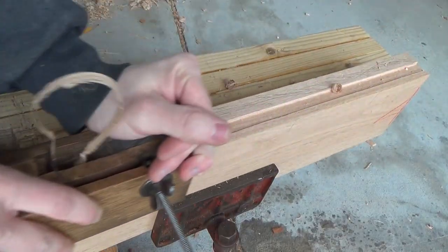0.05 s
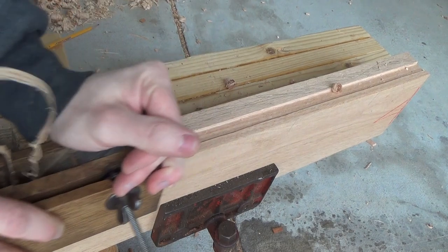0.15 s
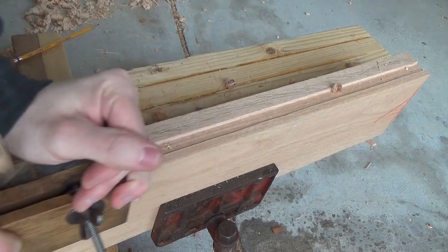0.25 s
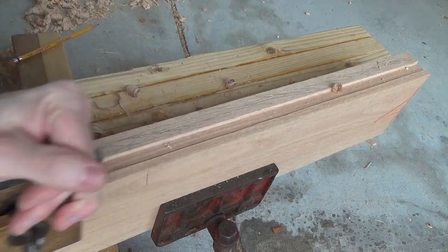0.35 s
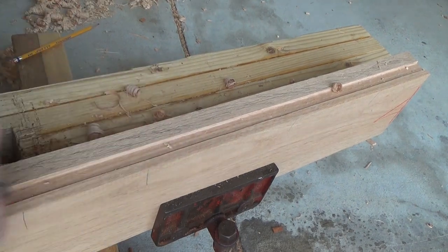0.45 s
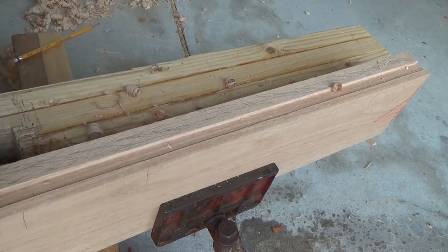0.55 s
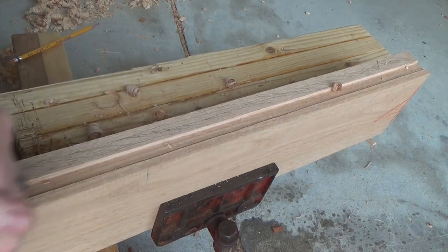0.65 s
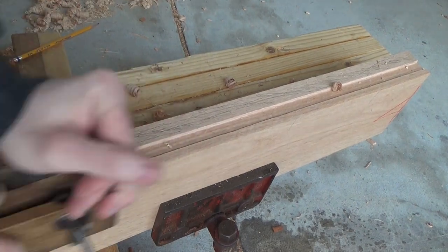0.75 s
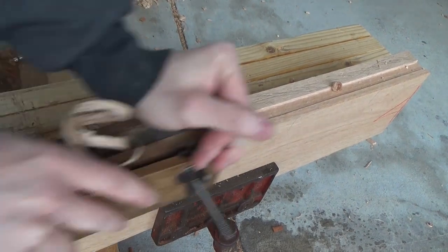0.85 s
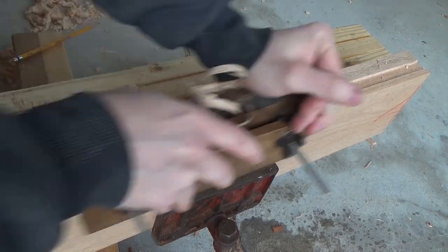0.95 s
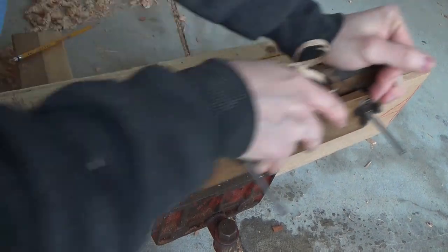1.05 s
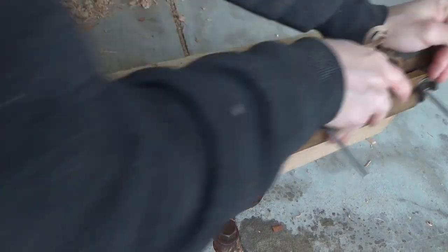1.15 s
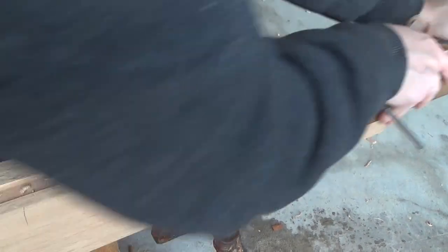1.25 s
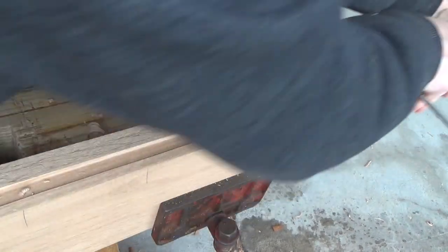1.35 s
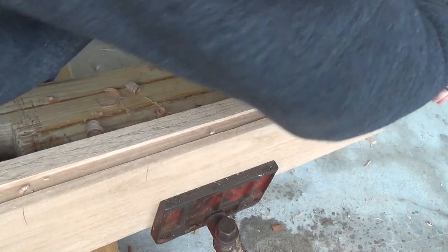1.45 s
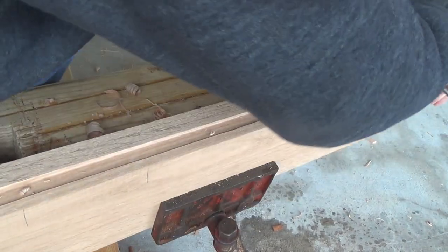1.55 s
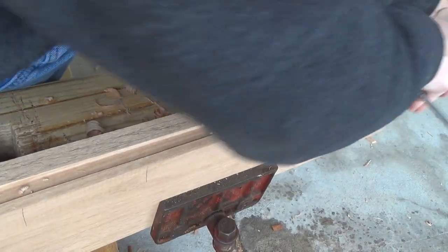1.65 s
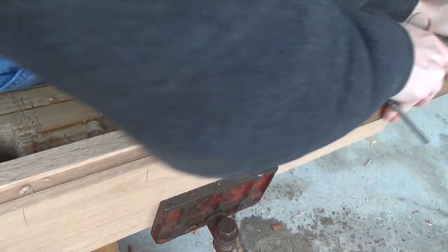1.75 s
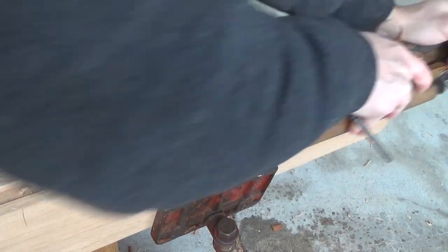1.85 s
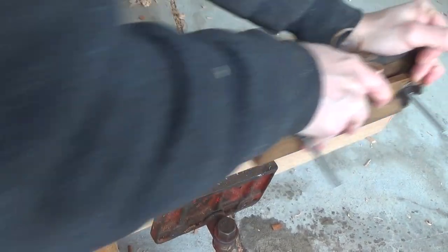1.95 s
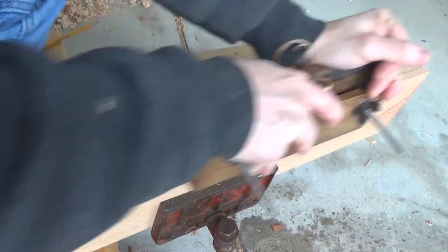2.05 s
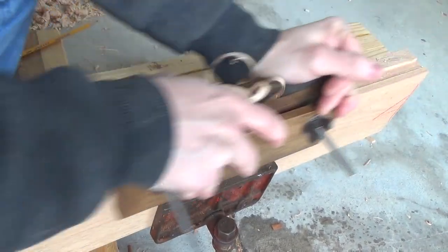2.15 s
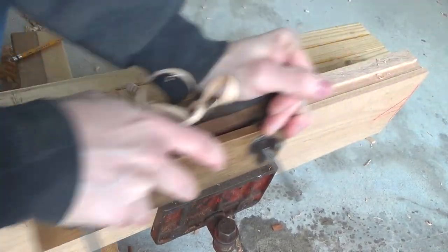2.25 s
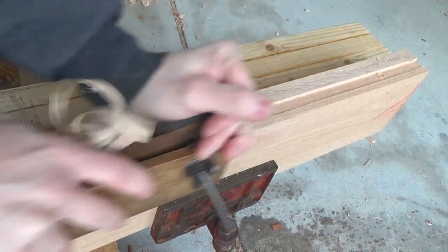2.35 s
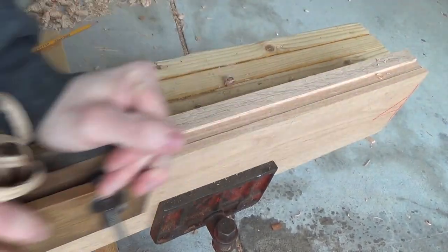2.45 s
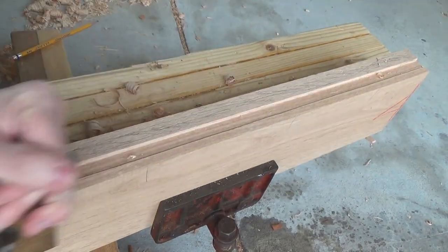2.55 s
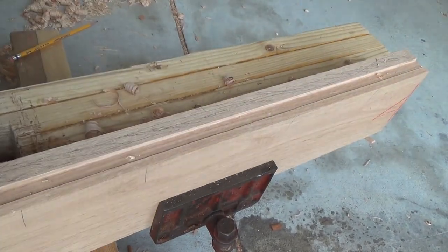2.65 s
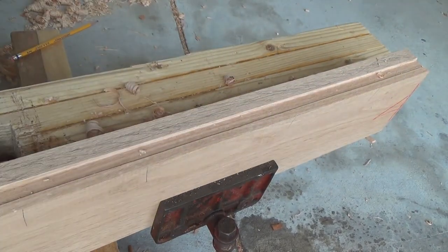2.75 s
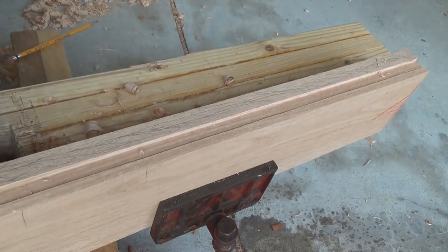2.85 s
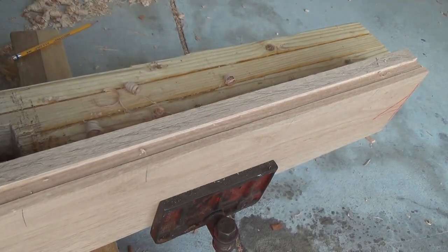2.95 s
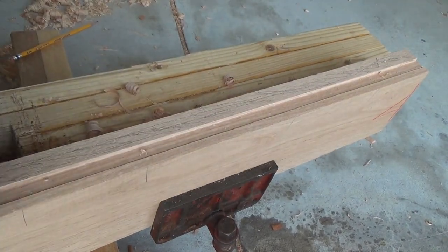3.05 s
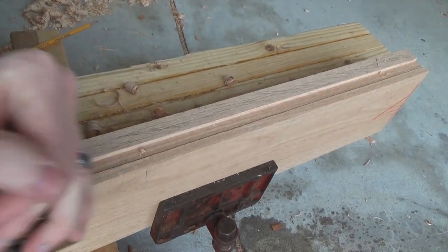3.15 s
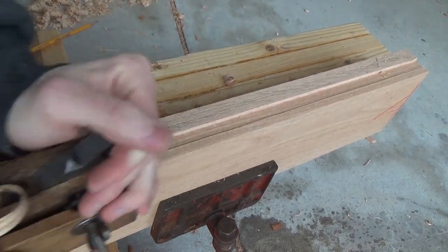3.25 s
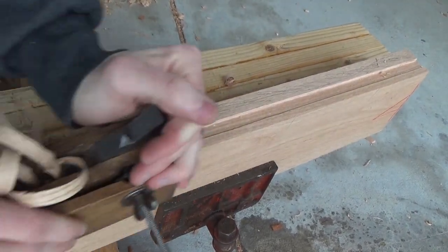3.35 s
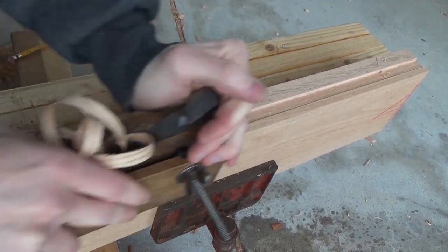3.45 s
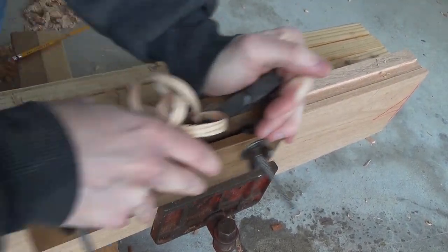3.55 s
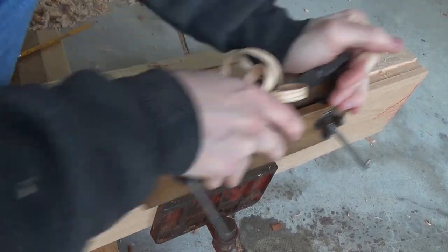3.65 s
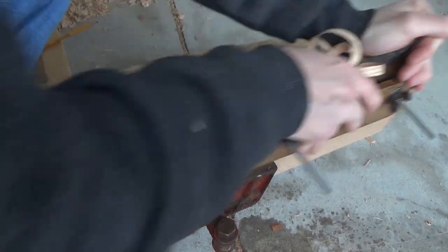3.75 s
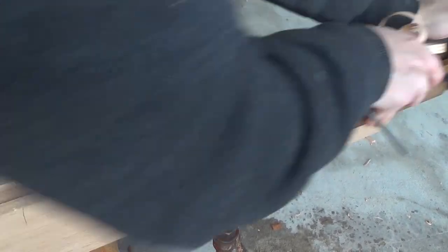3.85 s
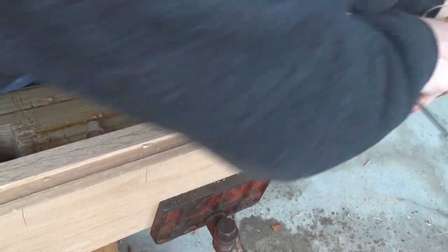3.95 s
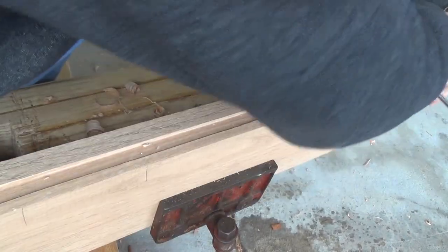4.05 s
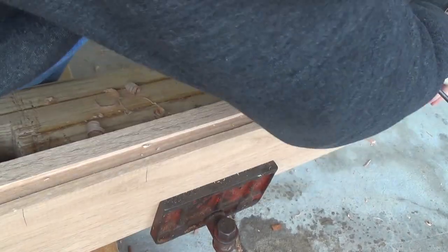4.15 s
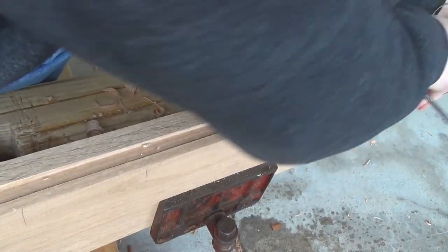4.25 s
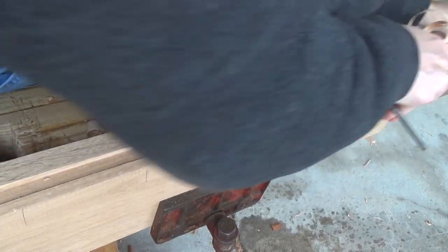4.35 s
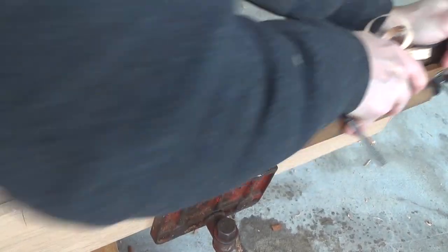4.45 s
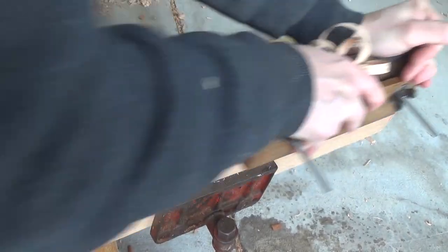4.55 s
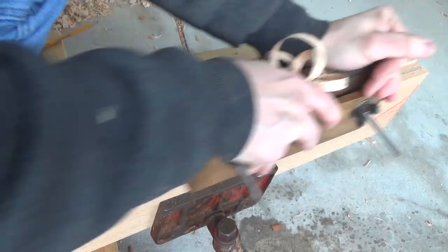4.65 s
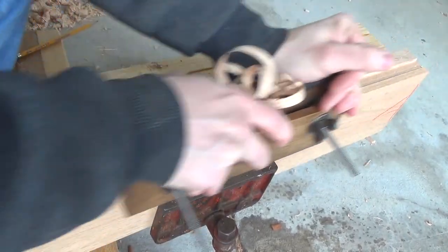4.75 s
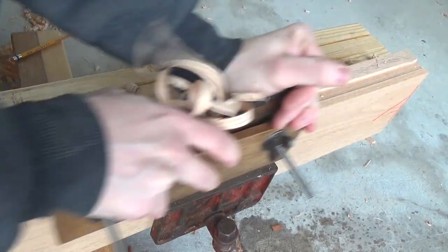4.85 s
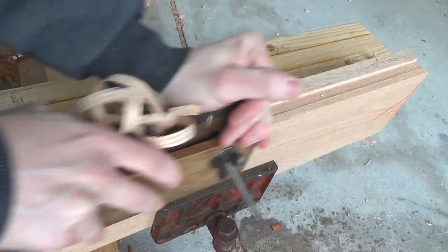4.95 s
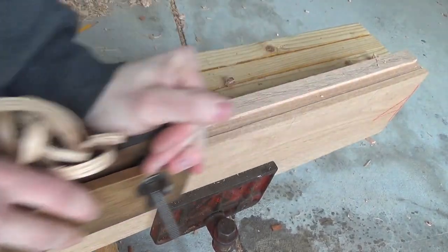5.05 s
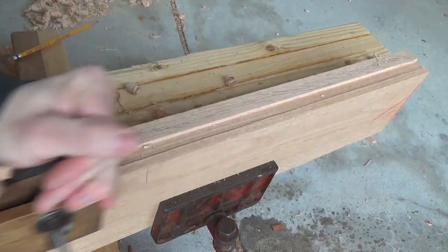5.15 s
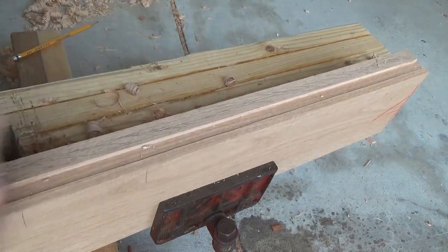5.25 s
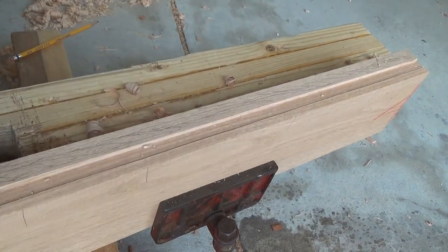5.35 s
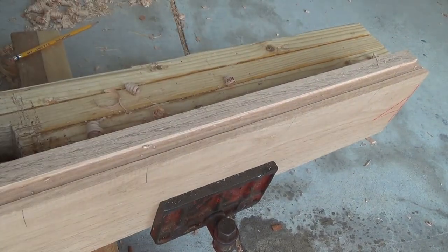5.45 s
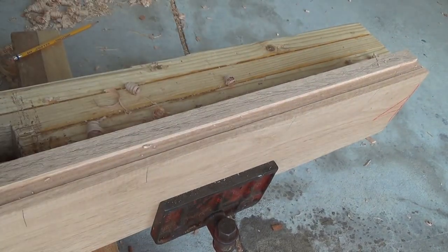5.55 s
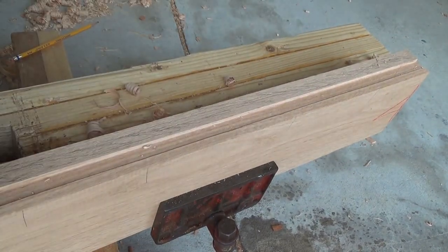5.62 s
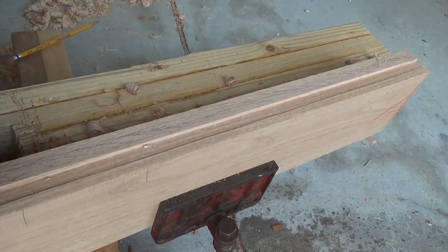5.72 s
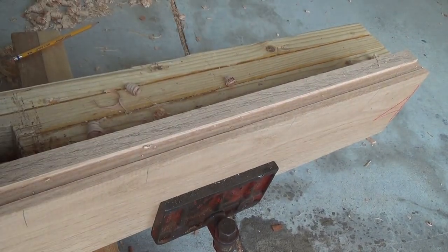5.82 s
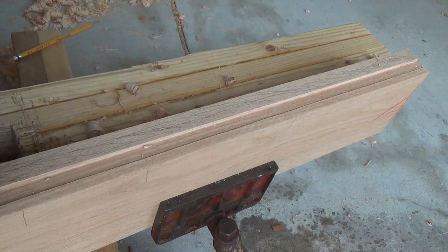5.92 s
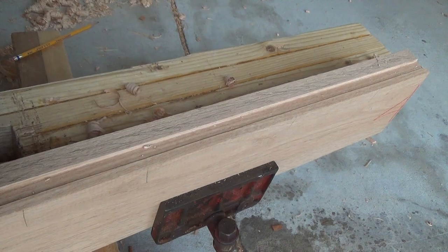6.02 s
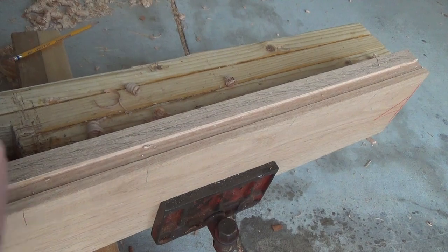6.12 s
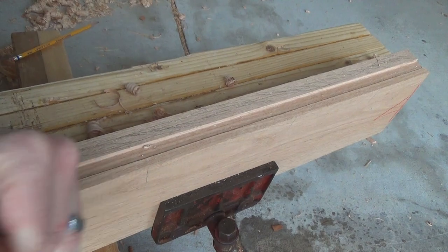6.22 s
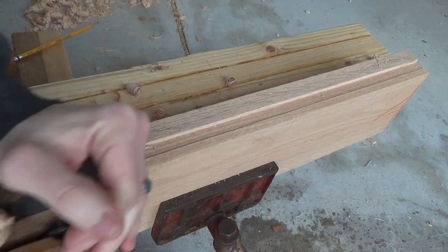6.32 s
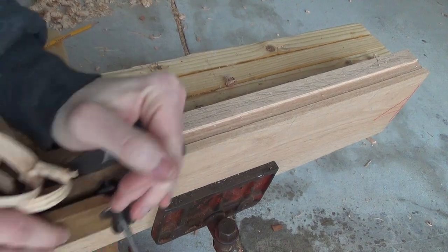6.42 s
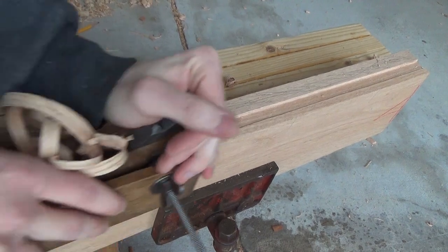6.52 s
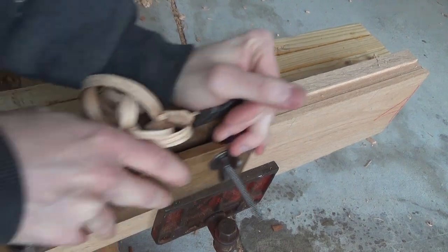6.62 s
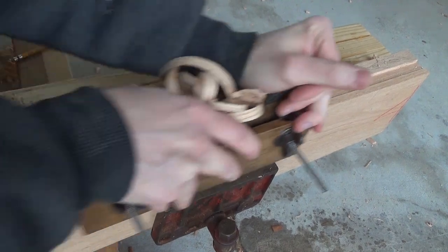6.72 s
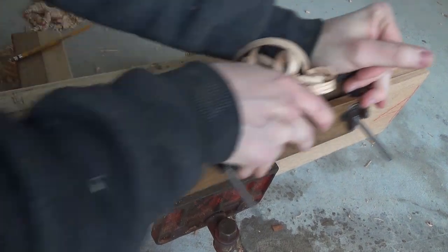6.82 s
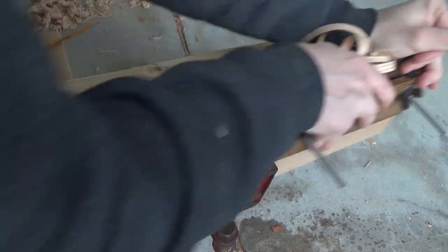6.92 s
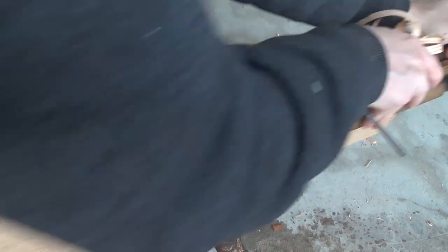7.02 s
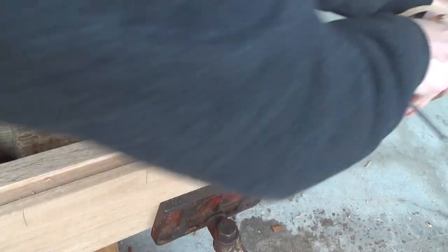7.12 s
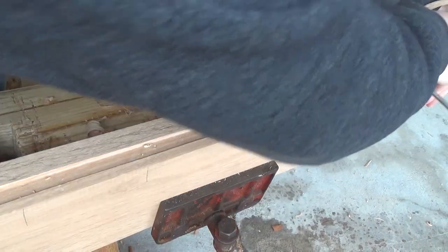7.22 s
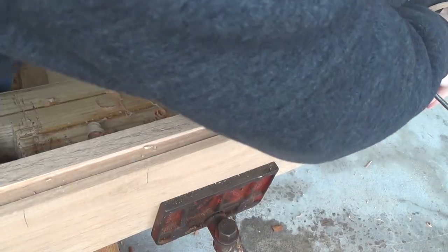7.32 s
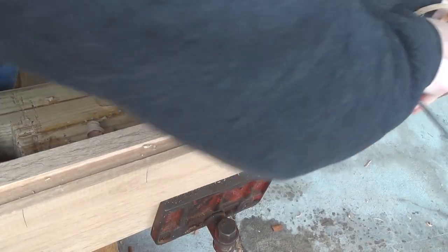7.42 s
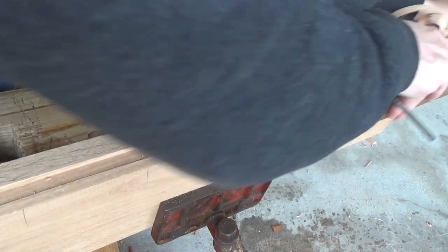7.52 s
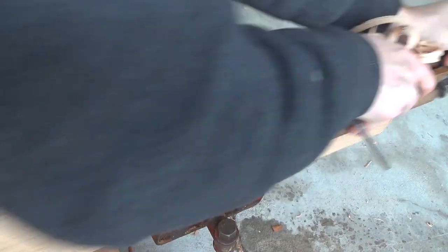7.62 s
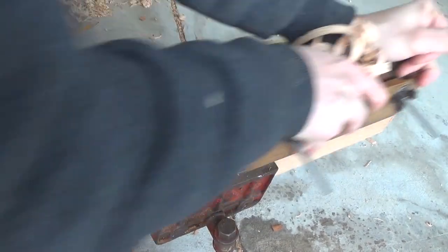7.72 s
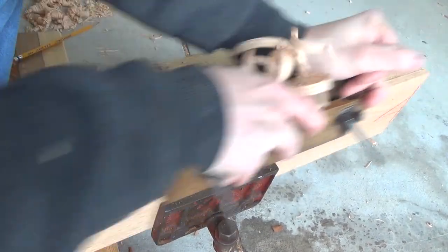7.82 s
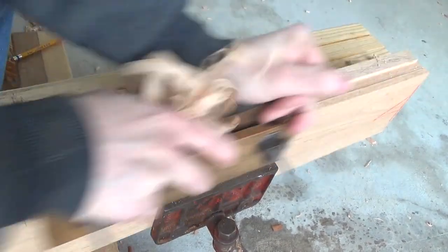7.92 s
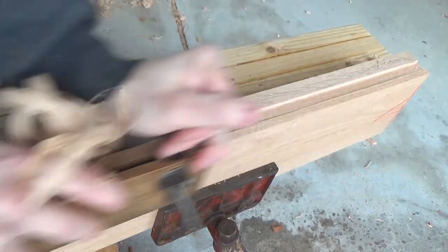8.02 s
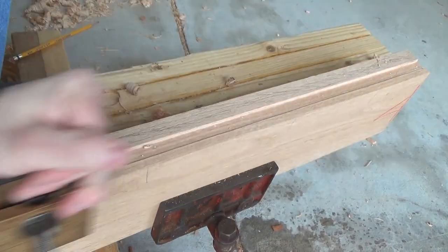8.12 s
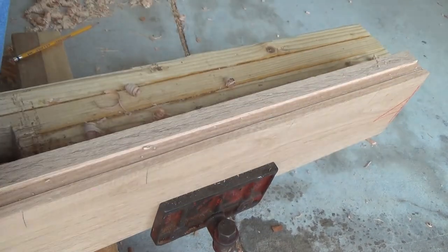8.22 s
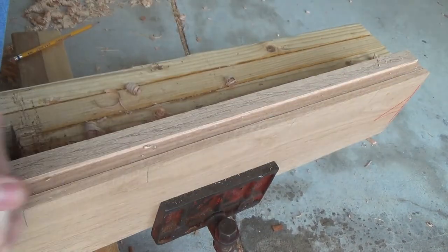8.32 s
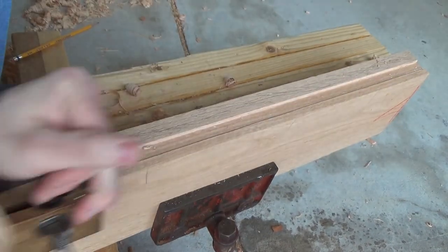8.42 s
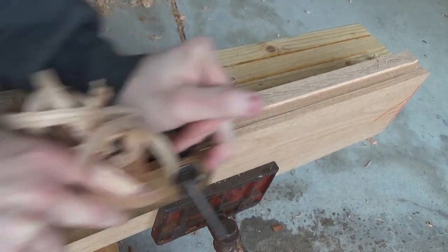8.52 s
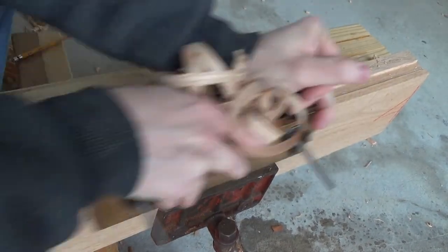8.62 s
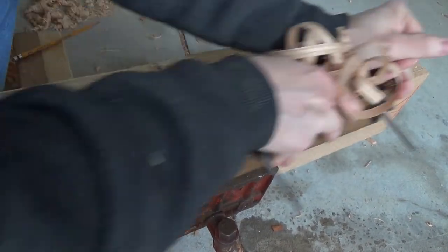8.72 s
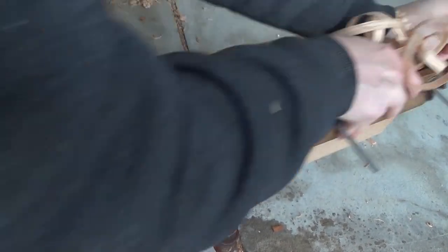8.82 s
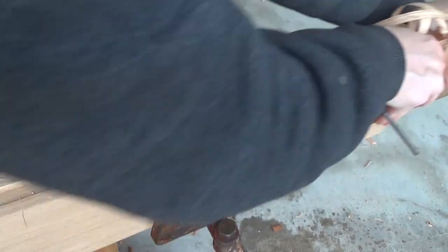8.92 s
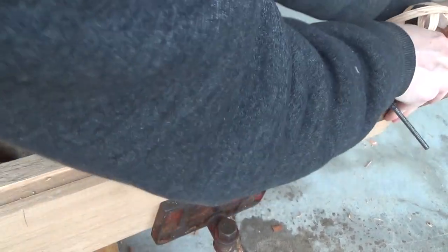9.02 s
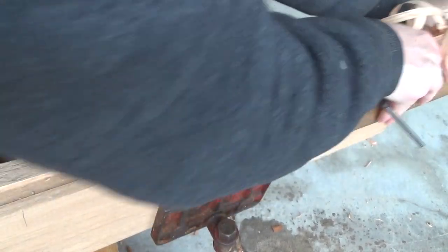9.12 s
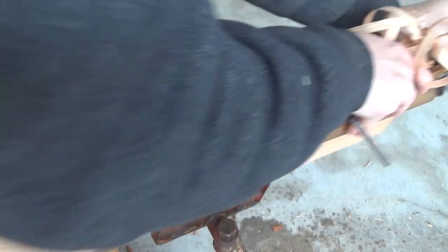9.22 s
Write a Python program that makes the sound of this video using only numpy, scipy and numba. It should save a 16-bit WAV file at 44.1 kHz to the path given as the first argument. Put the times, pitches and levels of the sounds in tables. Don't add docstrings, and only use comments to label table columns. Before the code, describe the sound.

A close, dry workshop scene with low airy hum and bench rumble. A raspy drag of a wooden plane on hardwood is under way until 0.5 s, then a brief lift with faint ticks. A lighter push runs 0.7-1.4 s, ending in a hard double knock. A long, strong drag tears from 1.75 to 2.65 s, with bright shaving crackles near 2.4. A clack at 2.8 and soft bumps around 3 s lead to landing knocks at 3.46 and an even push to 4.05. Another drag fills 4.4-5.3 s, then a sharp clatter at 5.5 and near quiet. A landing at 6.5 starts an uneven, squawking push to 7.25. The hardest drag, loud and coarse, peaks near 7.8 and ends at 8.2. A firm knock at 8.47 begins a push until 9; a final drag starts at 9.17 and is cut off.

```python
import sys
import numpy as np
from scipy import signal
from scipy.fft import rfft, irfft, next_fast_len
from scipy.io import wavfile
from scipy.ndimage import uniform_filter1d
from numba import njit

SR = 44100
rng = np.random.default_rng(int(sys.argv[2]) if len(sys.argv) > 2 else 0)


def gain_from_db(level_db):
    decades = np.asarray(level_db, float) / 20
    return 10 ** decades


def master(y):
    cut = np.clip(np.atleast_2d(y).T, -1, 1)
    pcm = np.round(cut * 32767)
    wavfile.write(sys.argv[1], SR, pcm.astype(np.int16))


N = 409236


def level(x, db):
    return x * gain_from_db(db) / np.sqrt(np.mean(x ** 2))


def colour(x, points):
    hz, db = np.transpose(points)
    n = next_fast_len(x.shape[-1])
    bins_hz = np.arange(n // 2 + 1) * SR / n
    gain = gain_from_db(np.interp(np.log(bins_hz + 1), np.log(hz), db))
    return irfft(rfft(x, n) * gain, n)[..., :x.shape[-1]]


def damped(x, top_hz):
    return signal.sosfilt(signal.butter(2, top_hz, fs=SR, output="sos"), x)


@njit
def svf(x, hz, width):
    y, b, l = np.empty(len(x)), 0., 0.
    for i in range(len(x)):
        g, k = np.tan(np.pi * hz[i] / SR), width / hz[i]
        v = (b + g * (x[i] - l)) / (1 + g * (g + k))
        b, l, y[i] = 2 * v - b, l + 2 * g * v, k * v
    return y


def burst_band(burst, hz, width_hz):
    return svf(burst, np.full(len(burst), 1. * hz), 1. * width_hz)


def walk(rate_hz):
    k = int(SR / rate_hz)
    held = np.repeat(rng.standard_normal(N // k + 1), k)
    return 1.49 * uniform_filter1d(uniform_filter1d(held, k), k)[:N]


def swell(t, s, db, rise_s, fall_s):
    range_db = 20
    return db - range_db * np.where(t < s, (s - t) / max(rise_s, .001), (t - s) / max(fall_s, .001))


def blend(movements):
    power = sum(gain_from_db(2 * db) for db, _ in movements)
    return 10 * np.log10(power), sum(gain_from_db(2 * db) * quality for db, quality in movements) / power


def add(out, s, sound):
    i = int(s * SR)
    out[i:i + len(sound)] += sound[:N - i]


def ring(hz, t60_s, t):
    return np.sin(2 * np.pi * hz * t) * np.exp(-np.log(1000) * t / t60_s)


def wide_noise(points):
    mid, side = colour(rng.standard_normal((2, N)), points)
    return mid + .5 * side * np.array([[1], [-1]])


# freq_hz, density_db_per_hz
AIR = [(18, -35), (30, -41), (109, -48), (239, 6), (486, -8.5), (721, 0.5), (1350, -6), (1540, -6.5),
       (1720, -7), (4300, -27), (9970, -26.5), (14000, -23), (16000, -15)]
# pitch_hz, rms_db
WHINE = [(15734, -63)]
# peak_s, peak_db, rise_s, fall_s
RUMBLE_SWELLS = [(0.1, -38.5, .5, 5), (0.7, -51, .5, .6), (1.5, -35, 0.25, 2.3), (2.4, -30.5, 1.2, 2.9),
                 (3.1, -32.5, 2, 0.71), (3.7, -41, .6, 0.5), (5.65, -34.5, .6, 0.52), (6.1, -36.5, 0.55, 1.5),
                 (6.6, -34, 0.65, 0.28), (7.6, -33.5, 0.65, 0.62), (8.55, -37, 0.33, .6), (9.25, -31.5, 0.42, 1.5)]


def hum(t):
    air = level(wide_noise(AIR), -37) * gain_from_db(1.0 * walk(3.59))
    still_db = -51
    rumble_db, _ = blend([(swell(t, *row), 0) for row in RUMBLE_SWELLS] + [(still_db, 0)])
    bass = wide_noise([(15, -30), (30, 4), (50, -4), (65, -1.5), (105, 0.5), (160, -3), (300, -45)])
    rumble = level(bass, 0) * gain_from_db(rumble_db + 2.6 * walk(10))
    whine = sum(np.sqrt(2) * gain_from_db(db) * np.sin(2 * np.pi * hz * t) for hz, db in WHINE)
    return air + rumble + whine


def fibres(per_s, spread_db):
    breaks = rng.random(N) < per_s / SR
    return level(breaks * rng.standard_normal(N) * gain_from_db(spread_db * rng.exponential(size=N)), 0)


def resonate(force, modes, weight, drift, shift=1):
    out, power = 0, 0
    for k, (hz, width_hz, db) in enumerate(modes):
        gain = gain_from_db(db) * weight(hz)
        width_hz = min(width_hz, 25 + .04 * hz)
        mode = svf(force, hz * shift * (1 + drift * walk(5)), 1. * width_hz)
        mode = mode * np.sqrt(SR / np.pi / width_hz)
        out = out + (-1) ** k * gain * gain_from_db(2.0 * walk(12)) * mode
        power = power + gain ** 2
    return out / np.sqrt(power)


# freq_hz, width_hz, level_db
BODY = [(645, 92, -5.5), (786, 22.4, -3), (857, 52, -3), (1003.5, 86, -1.5), (1110, 130, -1),
        (1285.5, 210, 0.5), (1381, 87, -0.5), (1583, 270, -3.5), (1992, 140, -8)]


def body(cut, body_db, grip):
    upper = np.clip(grip, .05, .95)
    deep = gain_from_db(0.3 * (np.clip(body_db, -28, -12) + 7.0))

    def weight(hz):
        if hz > 1200:
            return upper ** 2
        return (1 - upper) ** 2 * (deep if hz < 950 else 1)

    return gain_from_db(body_db) * resonate(damped(cut, 2900), BODY, weight, drift=0.015)


# freq_hz, width_hz, level_db
BLADE = [(2143, 750, -3), (2486, 400, -1), (2786, 540, 1), (3043, 360, 0.5), (3855, 480, -8),
         (5306, 660, 1), (6184, 270, -3.5)]


def blade(cut, body_db, blade_db, shaving_db, shift):
    bright = gain_from_db(.7 * (shaving_db - blade_db + 3) + .4 * np.clip(body_db + 24, -15, 0))
    sound = resonate(damped(cut, 7500), BLADE, lambda hz: bright if hz > 4500 else 1,
                     drift=.012, shift=np.sqrt(shift))
    return gain_from_db(blade_db + .5 * np.clip(body_db + 29.5, -12, 0)) * sound


# freq_hz, density_db_per_hz
SHAVING = [(2940, -5), (5000, -3), (5380, -11.5), (6700, -6), (8380, -6), (11500, -5), (15100, -13),
           (16000, -73)]


def shaving(chatter, body_db, shaving_db, shift):
    curl = colour(fibres(12000, spread_db=1.5) * gain_from_db(0.78 * chatter), SHAVING)
    curl = curl + .65 * svf(curl, 8400 * shift * (1 + .02 * walk(4)), 500.)
    high = svf(curl, 11200 * shift * (1 + .04 * walk(4)), 400.)
    curl = level(curl + .6 * high, 0)
    grain = sum((gain_from_db(2.2 * walk(18)) - 1) * burst_band(curl, hz, hz / 4)
                for hz in (4200., 6000., 8000., 10500.))
    curl = curl + grain
    dull = damped(curl, 12600)
    top_db = 0.29 * (np.clip(shaving_db, -50, -15) + 25) + 0.66 * (shaving_db - body_db + 6) + 1.2 * walk(25)
    return gain_from_db(shaving_db) * (dull + (curl - dull) * gain_from_db(top_db))


# freq_hz, width_hz, level_db
BENCH = [(160, 64, 1.5), (236.4, 20.4, 0), (318, 40, -3), (438.3, 60, -0.5), (548, 98, -3.5),
         (195, 56, -0.5), (274, 50, -3.5), (385, 60, -7), (651, 60, -6.5), (810, 100, -6)]
# peak_s, peak_db, rise_s, fall_s, favoured_hz
SHUDDERS = [(0.21, -22, 0.46, 0.41, 179), (.3, -28, 0.69, .35, 560), (0.75, -28, 0.16, 0.29, 205),
            (1.03, -26.5, 0.11, 0.32, 295), (1.3, -27, 0.2, .3, 440), (1.425, -16, 0.034, 0.17, 328),
            (1.87, -18.5, 0.18, 0.48, 263), (2.3, -24.5, 0.56, 0.56, 520), (2.83, -28.5, 0.26, 0.4, 200),
            (3.49, -19, 0.036, 0.41, 298), (4.05, -28, 0.21, 0.15, 325), (4.4, -32.5, 0.043, 0.33, 340),
            (4.82, -22, 0.36, 0.56, 260), (5.512, -14, .006, .09, 720), (5.525, -14.5, 0.012, 0.13, 400),
            (5.6, -24, 0.056, 0.24, 237), (5.87, -31, .2, 0.42, 252), (6.2, -38, 0.98, 1.5, 420),
            (6.5, -17.5, .02, 0.44, 300), (7.25, -22.5, 0.094, 0.26, 300), (7.53, -19, .02, 0.44, 248),
            (8.474, -15, 0.013, 0.25, 195), (9.2, -24, 0.026, 1.5, 320)]


def bench(t):
    rest_db, rest_hz = -42.5, 280
    moves = [(swell(t, *row[:4]), row[4]) for row in SHUDDERS]
    bench_db, bench_hz = blend(moves + [(rest_db, rest_hz)])
    force = damped(fibres(1500, spread_db=1.5), 970)
    sound = resonate(force, BENCH, lambda hz: gain_from_db(-6.0 * np.abs(np.log2(hz / bench_hz))), drift=0.029)
    return gain_from_db(bench_db) * sound


def stroke(t, rows):
    s, db, shading, grip = np.transpose(rows)
    landing_db, landing_db_per_s, lift_db_per_s = -13.5, 900, 147
    before_db = np.where(t < s[0], landing_db - landing_db_per_s * (s[0] - t), 0)
    lift_db = lift_db_per_s * np.maximum(t - s[-1], 0)
    pressure_db = np.interp(t, s, db) + before_db - lift_db
    return pressure_db, np.array([np.interp(t, s, shading), np.interp(t, s, grip)])


# time_s, pressure_db, arm_shading_0_1, upper_mode_grip_0_1
DRAGS = [
    [(0.0, -24.5, 0.02, 0.45), (0.2, -19, 0.52, 0.48), (0.35, -18, 0.34, 0.45), (0.362, -31, 0, 0.55),
     (0.39, -17.5, 0.44, 0.5), (0.488, -19, 0.26, 0.54), (0.5, -26.5, 0.04, .5)],
    [(1.754, -19, 0.48, 0.47), (1.86, -13.5, 0.98, 0.53), (1.964, -13, 0.94, 0.5), (2.3, -16, 0.56, 0.5),
     (2.536, -17, 0.27, 0.62), (2.652, -18.5, 0.44, 0.54)],
    [(4.375, -20.5, 0.36, 0.48), (4.408, -24, 0.4, 0.47), (4.584, -15, 0.78, 0.55),
     (4.84, -16.5, 0.46, 0.48), (5.1, -17.5, .3, 0.51), (5.295, -19.5, 0.31, 0.53), (5.31, -25, 0.36, 0.57)],
    [(7.515, -23, 0.24, 0.57), (7.577, -23.5, 0.2, 0.42), (7.621, -18, 0.65, 0.46), (7.777, -10, 1, 0.63),
     (7.9, -14.5, 0.4, 0.48), (8.045, -14, 0.22, 0.58), (8.207, -20, 0.19, 0.5)],
    [(9.175, -26.5, 0.63, .5), (9.28, -14, 1, 0.48)],
]
# time_s, pressure_db, arm_shading_0_1, upper_mode_grip_0_1
PUSHES = [
    [(0.686, -29.5, 0.9, 0.45), (0.868, -28, 0, 0.61), (1.022, -19, 0.36, 0.57), (1.06, -23.5, 0.02, 0.5),
     (1.284, -19, 0.71, 0.46), (1.42, -24, 0.26, 0.42)],
    [(3.455, -24.5, 0.46, 0.72), (3.6, -23.5, 0.34, 0.45), (3.76, -23.5, 0.4, 0.53),
     (3.79, -21.5, 0.5, 0.52), (3.9, -23.5, 0.72, 0.42), (4.045, -24.5, 0.54, 0.51)],
    [(6.477, -24.5, 0.8, 0.61), (6.653, -28.5, 0.34, 0.48), (6.803, -19, 0.48, 0.58),
     (7.065, -23.5, 0.5, 0.44), (7.145, -27.5, 0.4, 0.47), (7.24, -22.5, 0.76, 0.41),
     (7.265, -31.5, 0.26, 0.44)],
    [(8.468, -16.5, 0.9, 0.46), (8.5, -22.5, 0.54, 0.53), (8.596, -24, 0.16, 0.65),
     (8.642, -17, 0.37, 0.62), (8.82, -23.5, 0.45, 0.5), (9.002, -28, 0.4, 0.51)],
]
# peak_s, peak_db, rise_s, fall_s, arm_shading_0_1
HANDLING = [(0.56, -30, 0.12, 0.31, 0.54), (1.44, -22.5, .02, 0.15, 0.5), (7.28, -34, .02, 0.18, .7),
            (1.6, -43, 0.49, 0.58, 0), (1.74, -33, 0.18, .07, 0), (2.75, -36, 0.083, 0.42, 0.5),
            (2.816, -22, 0.0056, 0.086, 1), (2.92, -41, 0.052, 0.24, 0), (3.07, -51, .3, .05, 0),
            (4.35, -33.5, 0.12, 0.097, 0), (5.33, -21, .02, 0.05, 0.75), (5.44, -30, 0.052, 0.046, 0.7),
            (5.526, -13.5, 0.011, 0.089, 0.86), (5.6, -36.5, .05, 0.16, 0.1),
            (5.86, -40.5, 0.36, 0.14, 0.5), (6.11, -37.5, 0.2, 0.055, 0.14), (6.3, -38.5, 0.44, 1.5, 1.5),
            (7.5, -34, 0.2, .07, .2), (8.45, -34.5, 0.16, .07, 0.4), (9.16, -35.5, 0.15, 0.058, 0.1)]


def plane(t):
    rest_db, loose_grip = -66, 0.44
    lifted = [(swell(t, *row[:4]), row[4]) for row in HANDLING] + [(rest_db, 1)]
    moves = [stroke(t, rows) for rows in PUSHES + DRAGS]
    moves += [(db, np.array([[shade], [loose_grip]])) for db, shade in lifted]
    body_db, (shading, grip) = blend(moves)
    edge_db = -21 + 0.97 * (body_db + 21)
    blade_near_db, blade_far_db, shaving_near_db, shaving_far_db = -2, -8.5, 0.5, -11
    blade_db = edge_db + blade_near_db + (blade_far_db - blade_near_db) * shading
    shaving_db = edge_db + shaving_near_db + (shaving_far_db - shaving_near_db) * shading
    shift = 1 + 0.097 * (.5 - np.clip(shading, 0, 1))
    chatter = 0.68 * walk(40) + 0.86 * walk(160)
    cut = fibres(6000, spread_db=1.5) * gain_from_db(chatter)
    parts = body(cut, body_db, grip) + blade(cut, body_db, blade_db, shaving_db, shift)
    parts = parts + bench(t) + shaving(chatter, body_db, shaving_db, shift)
    return signal.sosfilt(signal.butter(2, 120, "high", fs=SR, output="sos"), parts)


# start_s, peak_db, pitch_hz
CATCHES = [(4.54, -13, 1350), (4.575, -10, 1090), (4.6, -9, 1300), (4.625, -9, 1150), (6.709, -12.5, 1355),
           (6.785, -9.5, 1325), (6.825, -12, 1300), (6.844, -10, 1330), (6.92, -8, 1310),
           (6.946, -10, 1390), (6.968, -12, 1325), (6.985, -12, 1030), (7.05, -12.5, 1360),
           (7.084, -15, 1073), (7.165, -17, 1030), (7.202, -15, 1010), (7.778, -5, 1306), (5.526, -7, 910),
           (5.545, -15, 1000), (1.756, -14, 1560), (1.775, -13, 1580), (6.83, -14, 1640),
           (0.135, -12, 1326), (0.275, -11, 1350), (0.415, -11, 1084), (0.482, -9, 1300), (1.02, -12, 1080),
           (1.21, -9, 1043), (1.285, -7, 1040), (5.325, -15, 1360), (7.66, -9, 1240), (7.745, -8, 1330),
           (8.2, -9, 1300), (3.32, -45, 3250), (3.35, -41, 3250), (6.09, -36, 3200)]


def catches():
    out, t = np.zeros(N), np.arange(SR // 10) / SR
    rise_s, t60_s = 0.0036, 0.043
    for s, db, hz in CATCHES:
        pair = ring(hz, t60_s, t) + 0.36 * ring(hz * 1.06, t60_s, t)
        tone = pair * (1 - np.exp(-t / rise_s))
        add(out, s, gain_from_db(db - 3.5) * tone / np.abs(tone).max())
    return out


# start_s, peak_db, pitch_hz
SNAPS = [(0.5254, -9, 5820), (2.3594, -8, 7910), (2.3744, -6, 5220), (2.3964, -4, 5960), (3.4914, -4, 4100),
         (3.5524, -5, 4860), (3.56, -7, 4790), (4.4254, -15, 5360), (4.7416, -6, 5450), (4.8854, -8, 5450),
         (4.9194, -12, 5460), (5.23, -9, 5350), (5.2764, -9, 5390), (6.4982, -7, 5670), (6.5124, -10, 4410),
         (6.554, -15, 5630), (7.534, -5, 4710), (7.56, -3, 4900), (7.8224, -6, 5180), (7.9169, -3, 5180),
         (7.9394, -4, 5180), (8.4761, -8, 4520), (8.5375, -6.5, 4120), (8.5834, -11, 5240),
         (8.6423, -4, 4930),
         (0.3521, -7, 9800), (0.4609, -9, 9510), (2.2164, -16, 12700), (2.2383, -15, 9700),
            (2.2744, -14, 10200), (2.3131, -6, 11500), (2.3294, -13, 9880), (2.3894, -10, 11400),
            (2.4244, -9, 10600), (2.4379, -4, 11100), (2.4573, -6, 10800), (2.5164, -15, 9850),
            (2.6394, -6, 11800), (2.6544, -19, 9760), (4.8894, -12, 9590), (5.0394, -10, 9650),
            (5.1394, -8, 11300), (7.89, -13, 10500), (8.0494, -7, 11200), (8.0994, -10, 10600)]


def snaps():
    out, t = np.zeros(N), np.arange(SR // 40) / SR
    for s, db, hz in SNAPS:
        burst = rng.standard_normal(len(t)) * np.exp(-t / 0.003)
        crack = burst_band(burst, hz, 0.23 * hz)
        add(out, s, gain_from_db(db - 3) * crack / np.abs(crack).max())
    return out


def struck(modes, t, chance, scatter_db):
    out = sum(gain_from_db(db + scatter_db * c) * ring(hz, 1.5 / width_hz, t)
              for (hz, width_hz, db), c in zip(modes, chance))
    return out / np.abs(out).max()


# start_s, peak_db, thud_minus_peak_db, crack_minus_peak_db, ring_hz
KNOCKS = [(0.511, -18, -19, 9, 1320), (1.005, -7, -14, -2, 1210), (1.405, -9, -12, -16, 1570),
          (1.419, -2, -12, -14, 1060), (1.754, -7.5, -40, -2, 1610), (2.816, -2, -28, -34, 1233),
          (3.457, -11, -3, -21, 1490), (3.47, -16, -12, 11, 1350), (3.537, -9, -9, -4, 970),
          (3.617, -12.5, -20, 3, 885), (3.796, -10, -25, -8, 1100), (4.045, -3.5, -15, -10.5, 1095),
          (5.506, -6, -8, -1, 1700), (6.478, -5.5, -27, -32, 1240), (6.489, -14.5, -16, 5.5, 1260),
          (6.525, -14, -13, -17, 2420), (6.542, -7.5, -17, -5, 1420), (6.664, -7, -20, -13, 1230),
          (7.236, -7, -8, -6, 960), (7.248, -11, 0, -5, 780), (7.517, -5, -21, -5.5, 1580),
          (8.469, -6, -12, -4, 1310), (8.528, -10, -14, -2.5, 1390), (9.172, -15, 2, -10, 2580)]


def knocks():
    out, t = np.zeros(N), np.arange(SR // 4) / SR
    for s, db, thud_db, crack_db, hz in KNOCKS:
        chance = rng.standard_normal((3, len(BENCH)))
        noise = damped(damped(rng.standard_normal(len(t)), 8000), 10000)
        crack = 1.7 * noise * np.exp(-t / .004) + .6 * struck(BLADE, t, chance[1], scatter_db=6)
        wood = 0.61 * struck(BODY, t, chance[0], scatter_db=9.0) + 0.6 * ring(hz, 0.035, t)
        thud = struck(BENCH, t, chance[2], scatter_db=8)
        blow = wood + gain_from_db(crack_db) * crack + gain_from_db(thud_db) * thud
        add(out, s, gain_from_db(db) * (1 - np.exp(-t / .0008)) * blow)
    return out


# start_s, peak_db, ring_hz
TICKS = [(0.634, -21, 4060), (0.6514, -24, 3890), (0.6818, -26, 2480), (0.715, -19, 2170),
         (2.7696, -10.5, 2700), (2.77, -14, 6540), (2.816, -15, 2920), (2.8544, -20, 5100),
         (2.9037, -23, 2700), (2.9317, -22.5, 5600), (3.0415, -31, 7000), (3.3694, -30.5, 2200),
         (4.2797, -30, 6590), (4.359, -15, 2840), (4.3745, -9.5, 2720), (5.3258, -9.5, 4870),
         (5.4314, -11, 4480), (5.4442, -17, 2600), (5.721, -34, 2540), (5.9733, -53, 2220),
         (6.1873, -27.5, 3370), (6.525, -11, 2370), (6.5255, -12, 3700), (7.2395, -14, 4800)]


def ticks():
    out, t = np.zeros(N), np.arange(SR // 8) / SR
    for s, db, hz in TICKS:
        burst = rng.standard_normal(len(t)) * (np.exp(-t / 0.0033) + .12 * np.exp(-t / 0.023))
        click = 0.44 * burst_band(burst, 4500, 2100) + 2.0 * burst_band(burst, hz, 320)
        add(out, s, gain_from_db(db) * click / np.abs(click).max())
    return out


# start_s, peak_db, pitch_hz
BUMPS = [(0.685, -17.5, 160), (2.974, -16, 176), (2.989, -20, 152), (3.059, -14, 196), (3.083, -10.5, 99.6),
         (4.374, -16, 314), (6.026, -16, 80.7), (6.162, -16.5, 80), (1.404, -5.5, 350), (3.459, -10, 200),
         (3.53, -9.5, 350), (3.578, -12, 300), (6.479, -3, 420), (7.237, -3, 360), (7.237, -10, 170)]


def bumps():
    out, t = np.zeros(N), np.arange(SR // 8) / SR
    for s, db, hz in BUMPS:
        add(out, s, gain_from_db(db) * ring(hz, 0.049, t) * (1 - np.exp(-t / 0.0015)) * 1.15)
    return out


# freq_hz, side_minus_mid_db
REFLECTED = [(60, -9), (110, -22), (200, -50), (380, -17), (700, -22), (1290, -7.5), (2380, -6.5),
             (4400, -7.5), (8120, -7.5), (15000, -24)]
# freq_hz, left_minus_right_db
LEFT = [(60, 6), (110, 5), (200, 0.5), (380, 7), (700, 2), (1290, 1.5), (2380, 1), (4400, 0), (8120, 0),
        (15000, 0)]


def workshop(x):
    t = np.arange(SR // 2) / SR
    t60_s, tail_db = 0.15, -11
    early = level(rng.standard_normal(len(t)) * np.exp(-t / 0.0031), -7.0) / np.sqrt(len(t))
    side = signal.fftconvolve(colour(x, REFLECTED), early)[:N]
    ports = np.array([colour(x, [(hz, ear * db / 2) for hz, db in LEFT]) + ear * side for ear in (1, -1)])
    noise = rng.standard_normal((2, len(t)))
    dull = signal.lfilter([.3], [1, -.7], noise)
    tail = dull + .5 * noise * np.exp(-t / 0.014)
    tail = tail * np.exp(-np.log(1000) * t / t60_s) * (1 - np.exp(-t / 0.0071))
    tail = level(tail, tail_db) / np.sqrt(len(t))
    return ports + signal.fftconvolve(x[None], tail, axes=1)[:, :N]


def scene():
    t = np.arange(N) / SR
    at_bench = plane(t) + catches() + snaps() + knocks() + ticks() + bumps()
    return workshop(at_bench) + hum(t)


@njit
def limiter(size, top, attack, release):
    gain, e = np.empty(len(size)), 0.
    for i in range(len(size)):
        e += (size[i] - e) * (attack if size[i] > e else release)
        gain[i] = min(1., np.sqrt(top / (e + 1e-9)))
    return gain


def low_pass(x):
    return signal.sosfilt(signal.butter(12, 16510, fs=SR, output="sos"), x)


# freq_hz, gain_db
MICROPHONE = [(20, -9), (60, 0.5), (9000, 3), (13000, -3), (15500, -3.5)]


def record(dry):
    heard = colour(dry, MICROPHONE)
    gain = limiter(np.abs(heard).max(axis=0), gain_from_db(-6.0), 0.0048, 0.0004)
    rounded = np.tanh(1.053 * heard * gain) / 1.042
    top_hz = 15800
    cut = signal.sosfilt(signal.ellip(8, .2, 50, top_hz, fs=SR, output="sos"), rounded)
    return low_pass(cut)


dry = scene()
out = record(dry)
master(out)
```